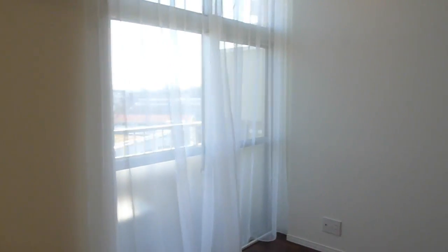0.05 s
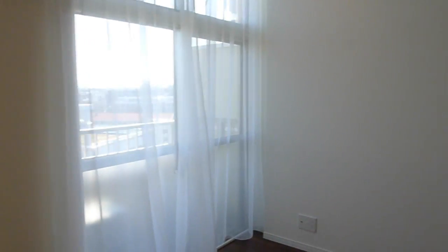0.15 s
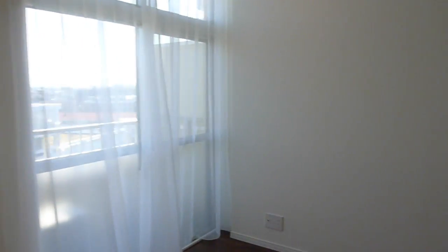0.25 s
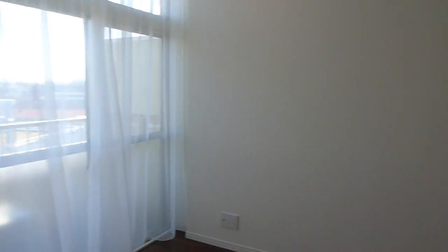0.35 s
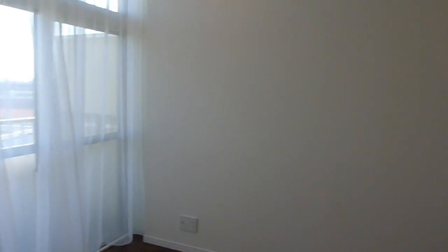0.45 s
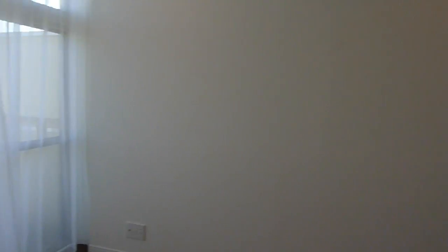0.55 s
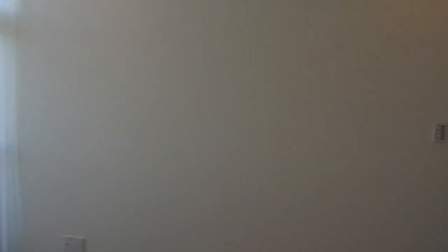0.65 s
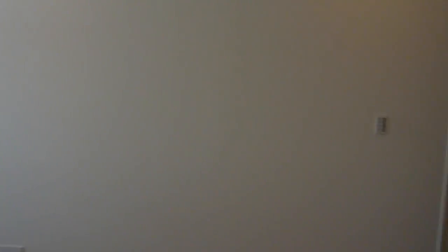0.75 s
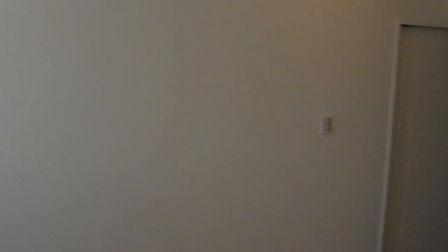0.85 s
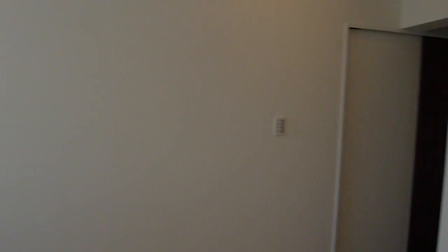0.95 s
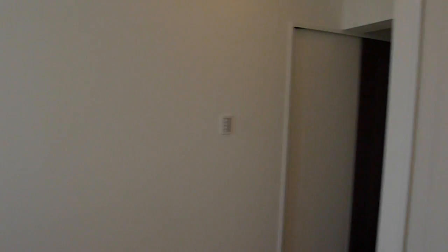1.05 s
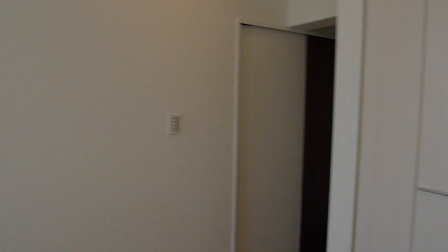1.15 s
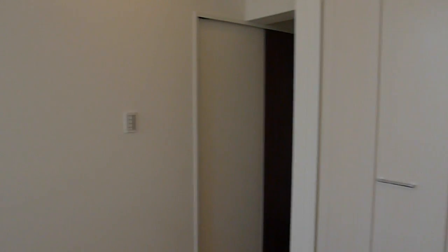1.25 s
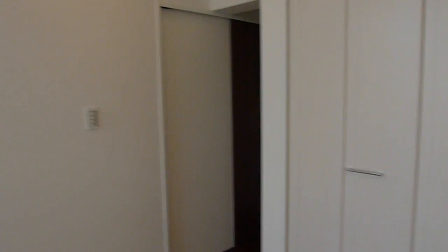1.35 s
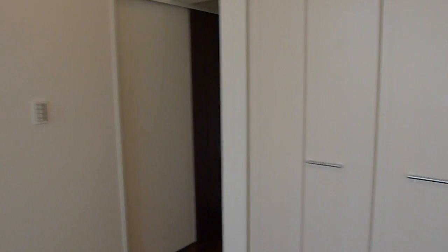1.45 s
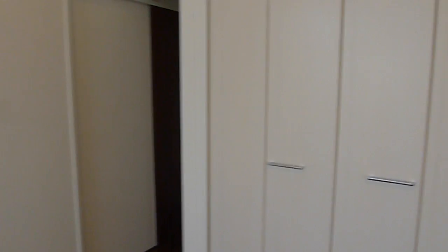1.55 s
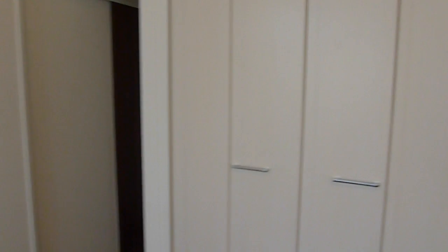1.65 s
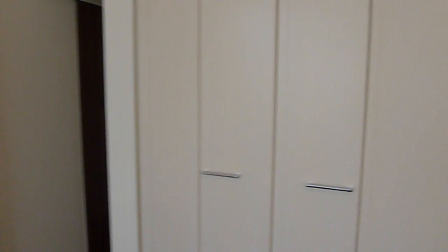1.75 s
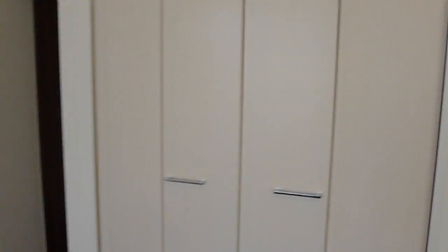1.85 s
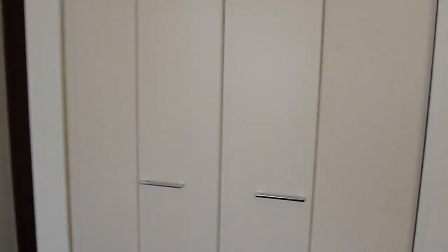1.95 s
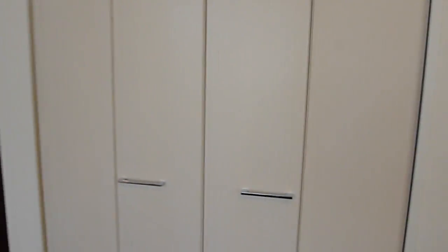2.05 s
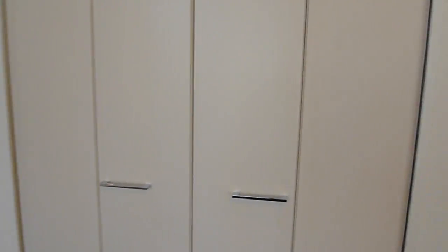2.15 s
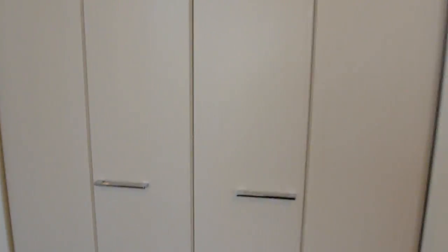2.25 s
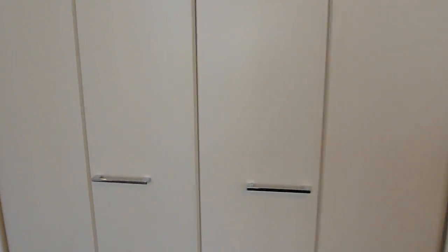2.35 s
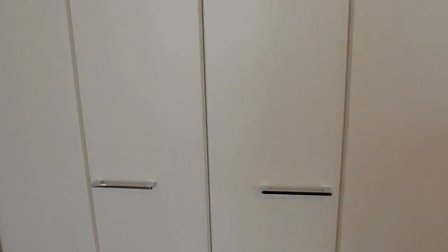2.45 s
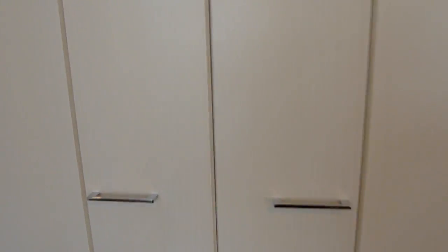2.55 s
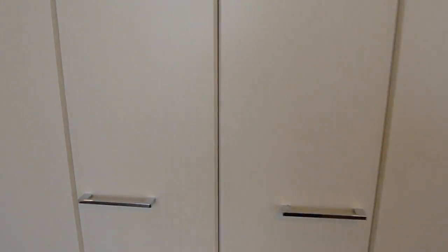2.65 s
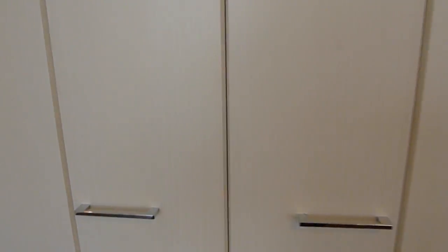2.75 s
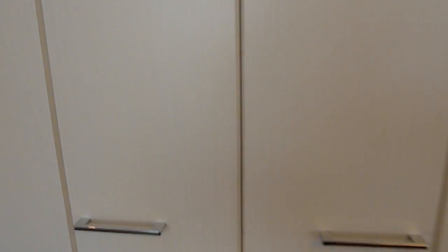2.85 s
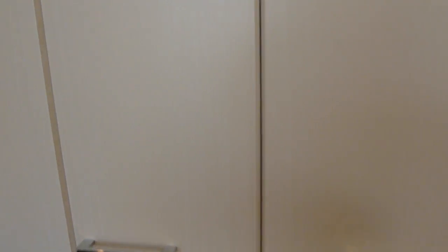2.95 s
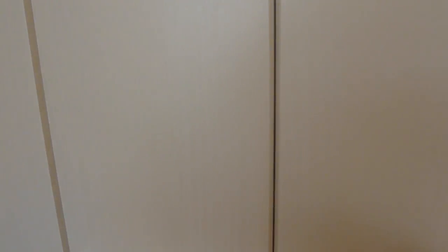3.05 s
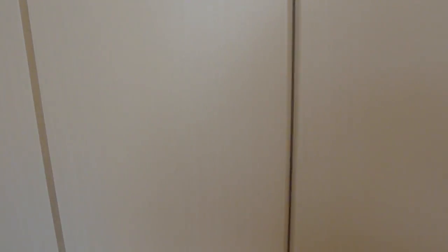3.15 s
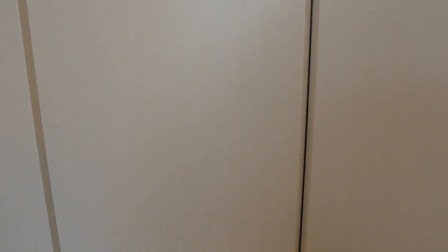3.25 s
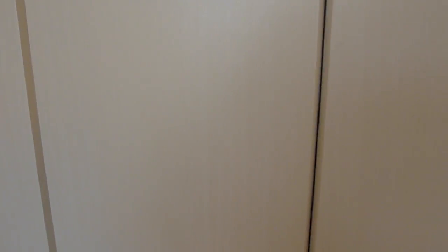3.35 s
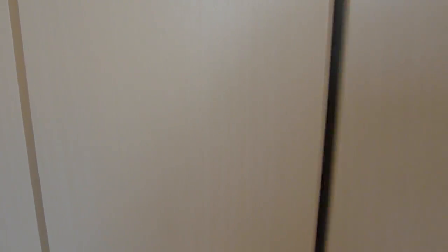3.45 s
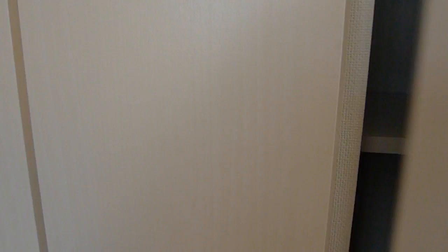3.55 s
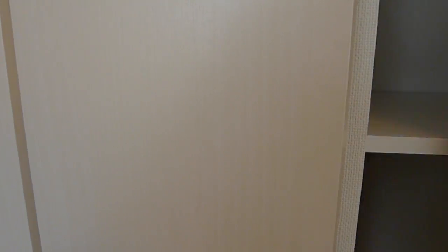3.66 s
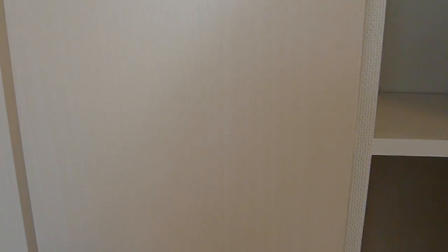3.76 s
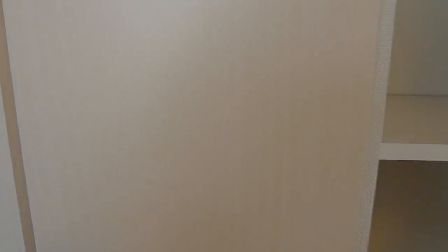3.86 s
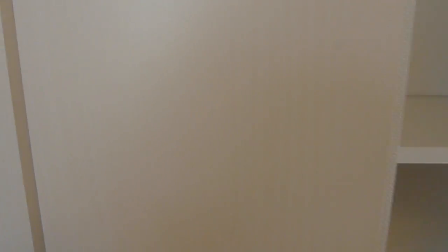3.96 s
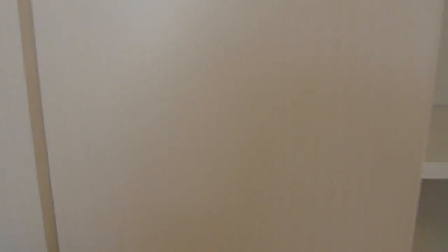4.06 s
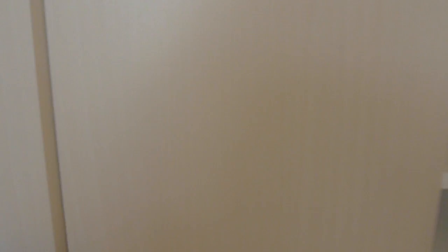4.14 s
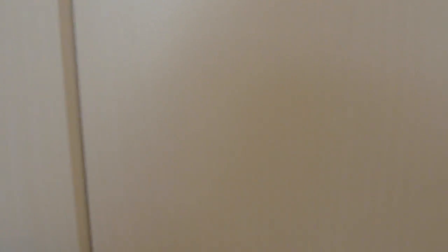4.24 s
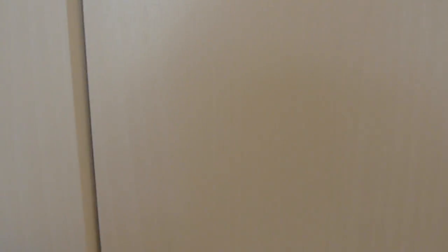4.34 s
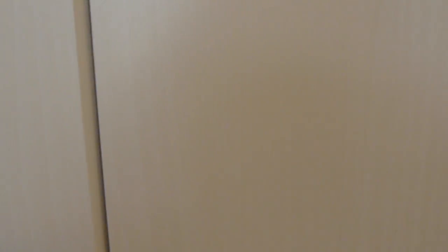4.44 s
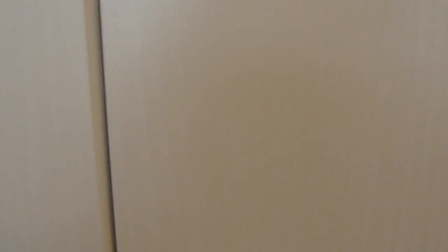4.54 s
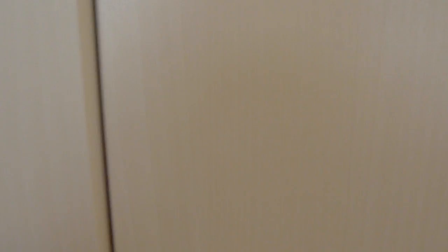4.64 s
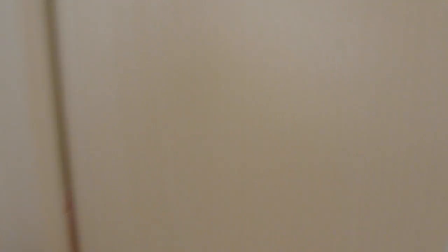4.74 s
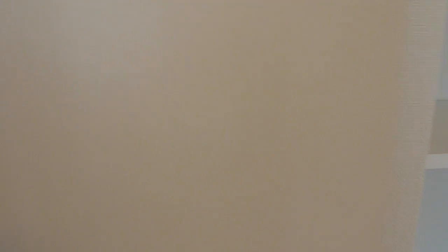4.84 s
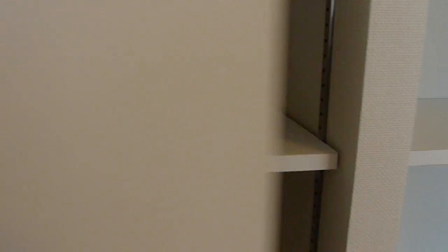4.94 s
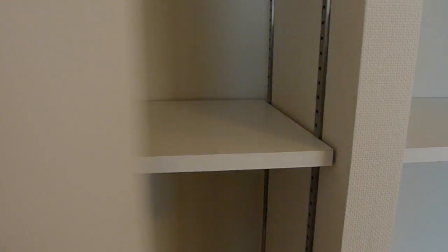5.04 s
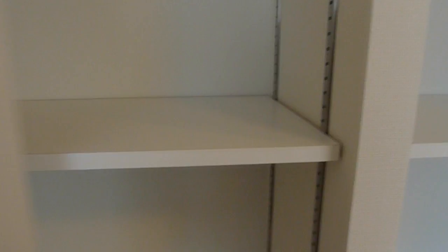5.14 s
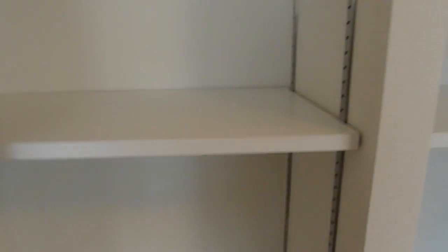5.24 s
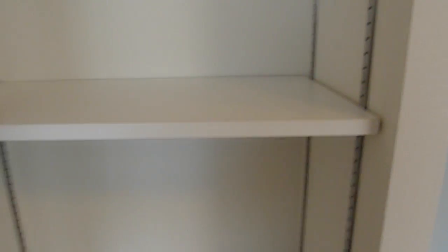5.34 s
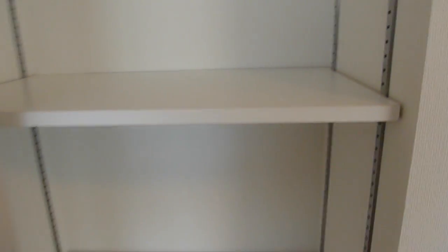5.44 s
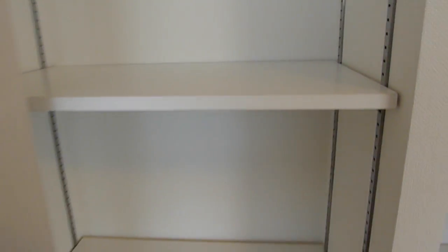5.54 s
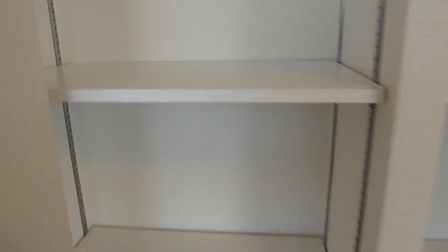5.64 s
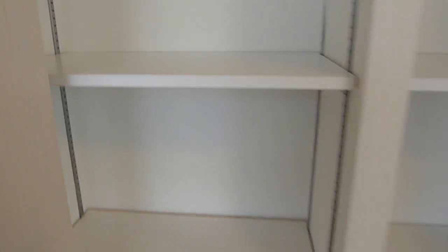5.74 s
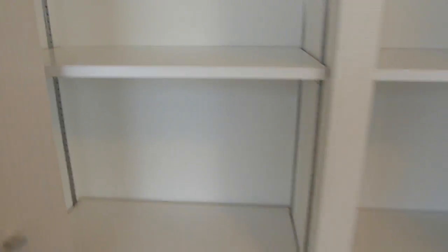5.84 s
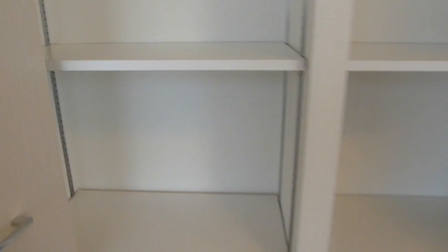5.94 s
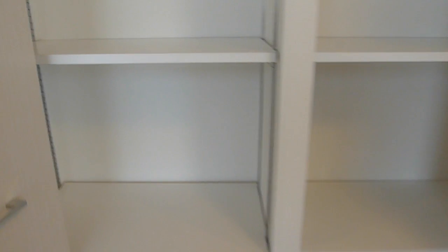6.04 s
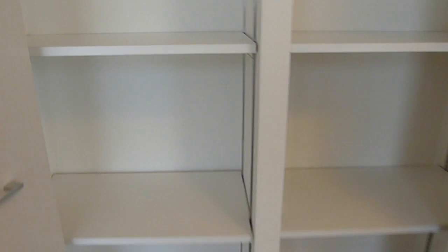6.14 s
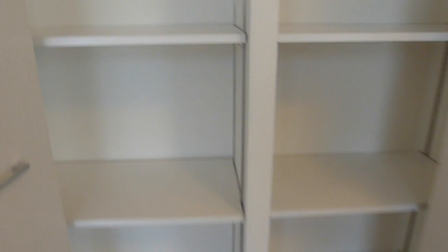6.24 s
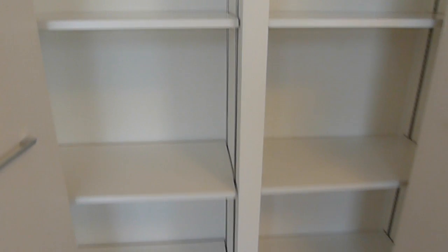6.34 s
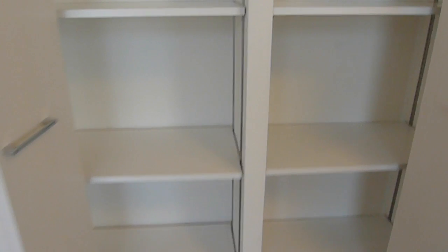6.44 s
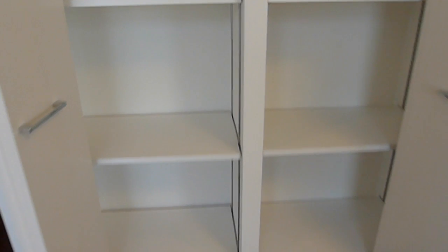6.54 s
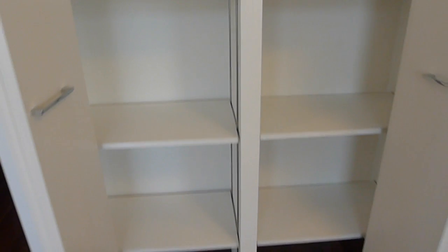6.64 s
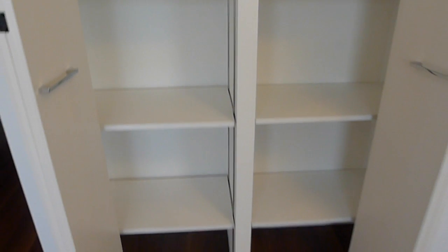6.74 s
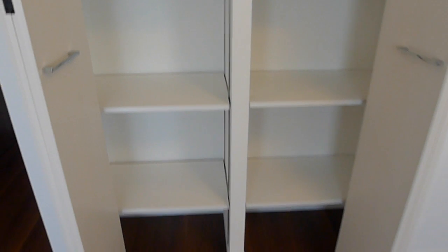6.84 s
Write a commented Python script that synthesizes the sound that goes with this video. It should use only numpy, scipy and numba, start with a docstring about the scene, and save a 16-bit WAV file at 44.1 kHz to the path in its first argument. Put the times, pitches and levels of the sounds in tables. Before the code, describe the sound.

Two hollow folding closet doors grind open along a metal track in turn, with rattles and sharp knocks, over a faint sinking engine drone.

```python
"""Two folding closet doors are pulled open in a bare room: roller grit grinds along the track and shakes
the hollow panels, metal and closet air as ringing modes; hinges and stops knock; sliding pins groan.
Someone walks with a small mono camera: clothes and socks swish as shaped noise, the floor booms and creaks,
ticks sound close to the microphone. Behind it a far engine drones as harmonics sinking in pitch, over
the noise hush of the room and a faint electronic whine."""
import sys
import numpy as np
from scipy import signal
from scipy.io import wavfile
from scipy.ndimage import uniform_filter1d
from numba import njit

SR = 44100
rng = np.random.default_rng(int(sys.argv[2]) if len(sys.argv) > 2 else 0)


def pcm_store(signal):
    """Save signal as 16-bit PCM."""
    levels = np.round(np.clip(np.atleast_2d(signal), -1, 1) * 32767)
    wavfile.write(sys.argv[1], SR, levels.astype(np.int16).T)


N = 304069
T = np.arange(N) / SR

# room and microphone noise spectrum, relative: freq_hz, density_db_per_hz
HUSH_SPECTRUM = [(15, -45), (25, 12.5), (102, -3), (161, 5.5), (335, 0.5), (1070, -4.5), (5000, -15.5),
                 (7510, -109.5), (8140, -87), (13600, -76), (14800, -33), (16000, -39)]
HUSH_RMS_DB = -48.5
WHINE_HZ, WHINE_RMS_DB = 14928, -76

# engine firing rate before random waver: time_s, firing_rate_hz
ENGINE_RATE = [(0, 39.48), (.86, 37.25), (1.3, 36.43), (2.15, 33.98), (3, 33.5), (6.9, 31.25)]
# engine gain: time_s, level_db
ENGINE_GAIN = [(0, -47), (.4, -50.5), (.9, -46), (1.4, -52.5), (2, -53), (2.6, -54.5), (3, -50.5), (6, -59),
               (6.9, -59)]
# engine harmonics: multiple_of_firing_rate, relative_level_db
ENGINE_HARMONICS = [(3, -7), (4, -1.5), (5, 1), (6, -5.5), (7, -9)]

# small dry ticks close to the microphone: start_s, level_db, pitch_hz, snap_to_tone_ratio, decay_tau_s
DRY_TICKS = [(1.479, -28.5, 1520, 1.2, 0.0018), (1.4816, -28.5, 603, 1.5, 0.0014),
             (2.1346, -20, 7100, 0.3, 0.00065), (2.1376, -18, 6070, 0.88, 0.001),
             (2.1418, -22, 6650, 0.6, 0.00088), (2.283, -30.5, 2100, 0.1, 0.002),
             (2.302, -20, 503, 1, 0.00033), (3.0878, -44.5, 8850, 0.5, .001),
             (3.283, -23, 7000, .4, 0.00057), (3.306, -24, 6200, 1, 0.00055),
             (3.398, -22, 5500, 0.84, 0.0012), (3.474, -36, 9270, .4, .0008),
             (5.108, -37.5, 10600, 0.9, 0.0023), (6.8495, -20, 2950, 0.23, 0.00035)]
TICK_THIN = 0.24  # how much the snap loses its low end

# faint creaks underfoot: start_s, length_s, slip_rate_hz, level_db
FLOOR_CREAKS = [(0.882, .05, 960, -44), (1.574, 0.032, 529, -44), (1.664, 0.059, 539, -41.5),
                (2.216, 0.052, 1003, -49)]
CREAK_OCTAVE_DB, CREAK_WAVER = -5, 0.1

# floorboards booming under the weight: time_s, level_db
FLOOR_BOOM = [(0, -62), (2.0, -63), (2.2, -65), (2.55, -50), (2.75, -54), (3.1, -64), (6.9, -77)]
# body movements: full_strength_s, rise_s, hold_s, cloth_db, feet_db
MOVEMENTS = [(0.006, 0.06, 0.055, -55, -44), (0.259, 0.045, 0.13, -39.5, -51),
             (0.63, 0.19, 0.049, -51.5, -44), (0.965, 0.24, 0.036, -49, -48),
             (1.243, 0.21, 0.0061, -45.5, -53), (1.503, 0.1, 0.14, -54.5, -48),
             (1.646, 0.27, 0.027, -48, -63), (1.933, 0.32, 0.033, -54, -45.5), (2.214, 0.12, 0.1, -42, -55),
             (2.518, 0.086, .02, -42, -49), (2.759, 0.051, 0.16, -32, -64), (3.157, 0.11, 0.23, -44, -44.5),
             (3.64, 0.69, 0.2, -44, -57), (4.047, 0.0041, 0.0034, -36, -51),
             (4.295, 0.065, 0.065, -47.5, -55), (4.46, 0.22, 0.014, -43, -45.5),
             (4.884, 1, 0.58, -50.5, -41.5), (5.52, .07, .01, -60, -63), (5.778, 0.1, 0.051, -48, -56),
             (6.17, 0.31, 0.014, -50, -70), (6.362, 0.037, 0.05, -41, -73),
             (6.731, 0.25, 0.011, -49.5, -45.5)]
RISE_DB, CLOTH_FADE_DB_PER_S, FEET_FADE_DB_PER_S = 19.5, 113, 39

# modes of the first door's panel: freq_hz, relative_level_db, t60_s
FIRST_PANEL_MODES = [(236, -6, 0.033), (313.5, -3.5, 0.051), (425, -1.5, 0.035), (521, -8, 0.045),
                     (602, -3.5, 0.036), (688, -7.5, 0.04), (823, -2.5, 0.021), (995, -5, 0.011)]
# modes of the second door's panel: freq_hz, relative_level_db, t60_s
SECOND_PANEL_MODES = [(203, -7.5, 0.099), (304, -4.5, 0.02), (390.5, -1.5, 0.034), (475, -6, 0.036),
                      (577, -1, 0.018), (728, -3, 0.015), (908, -3, 0.026), (1095, -5, 0.015)]
# modes of the metal track: freq_hz, relative_level_db, t60_s
TRACK_MODES = [(1130, 8.5, 0.007), (1430, -1, 0.034), (1562, 0.5, 0.033), (1763, 1, 0.023),
               (2032, 3, 0.017), (2343, 5.5, 0.0093)]
# modes of the roller pin: freq_hz, relative_level_db, t60_s
PIN_MODES = [(2765, 6, 0.0053), (3076, 1, 0.0091), (3530, 1.5, 0.0048), (4250, 2, 0.0057)]
# modes of the air shut in the closet: freq_hz, relative_level_db, t60_s
AIR_MODES = [(85.7, -7, 0.079), (131, -3.5, 0.046), (180, -2, 0.04)]
PANEL_SHIFT_DB, METAL_SHIFT_DB, AIR_SHIFT_DB = 3.2, 1.3, 1.9  # wander of each mode's drive

# one table per door, its roller travel: time_s, roller_force_db, air_thump_db
DOOR_TRAVEL = [
    [(3.14, -51, -48), (3.234, -39, -47), (3.3, -32, -44), (3.46, -33.5, -49), (3.55, -25, -39),
     (3.63, -21, -29), (3.718, -20, -36), (3.856, -22, -26.5), (3.95, -27.5, -35.5), (4.04, -34, -44),
     (4.174, -42.5, -48), (4.378, -48.5, -49), (4.43, -37.5, -50)],
    [(4.62, -49, -45), (4.716, -34.5, -51), (4.86, -21.5, -34), (4.95, -17, -33.5), (5.068, -19, -34),
     (5.19, -23.5, -20.5), (5.3, -31, -63), (5.44, -31, -31), (5.57, -31.5, -53), (5.73, -43.5, -64),
     (5.8, -36, -39), (6.0, -51, -61)],
]
SECOND_DOOR_S = 4.435
FULL_FORCE_DB = -20
TRACK_DB, TRACK_SLOPE = -23.5, 1.44  # level at full force; dB lost per dB of force
RUB_DB, RUB_SLOPE = -24.5, 1.66
SCRAPE_DB, GRIND_DB = 3.5, -1.5  # over the rub; over the track rattle
SCRAPE_DAMPING = 1.1
SOFT_HZ, HARD_HZ, HARDEN_DB_PER_OCTAVE = 412, 830, 11  # knocks push softly; rolling hardens with force

# hinge and stop knocks, levels before mixing: start_s, panel_db, crack_db, air_thump_db, chatter_tau_s
DOOR_KNOCKS = [(3.119, -29.5, -33, -34, 0.0073), (3.14, -22.5, -33, -45, 0.015),
               (3.199, -35, -53, -32.5, 0.0055), (3.294, -20.5, -16.5, -45, 0.0042),
               (3.314, -18, -24, -33, 0.017), (3.398, -22.5, -17, -20, 0.033),
               (4.048, -18, -16, -54, 0.016), (4.095, -27, -17.5, -48, 0.031),
               (4.441, -16, -24, -31, 0.039), (4.474, -19, -25, -48, 0.017), (4.507, -23, -40, -51, 0.0055),
               (4.554, -23, -21.5, -24, 0.0074), (4.574, -18.5, -10.5, -18, 0.039),
               (4.583, -17.5, -30, -13, 0.0029), (5.158, -12, -16, -20, 0.0078),
               (5.322, -2, -10, -11, 0.017), (5.352, -16, -30, -35, 0.0033),
               (5.363, -27, -6.5, -41, 0.0085), (5.375, -6.5, -27, -21, 0.0036),
               (5.471, -13.5, -19, -16, 0.014), (5.483, -6.5, -16.5, -20.5, 0.038),
               (5.519, -11.5, -16.5, -47, 0.026), (5.557, -11.5, -32, -20, 0.005),
               (5.762, -30, -27.5, -47, 0.0064)]
# stick-slip of the sliding pin near a mode of door or track: start_s, length_s, pitch_hz, level_db
PIN_GROANS = [(3.118, 0.032, 1500, -42), (3.245, 0.024, 870, -33.5), (3.556, 0.041, 2580, -32),
              (3.584, .13, 447, -22), (3.745, 0.14, 441, -23), (4.8, 0.14, 595, -30),
              (4.85, 0.063, 1564, -22.5), (4.92, 0.064, 910, -32), (4.944, 0.15, 379, -23.5),
              (5.233, 0.084, 1480, -32.5)]
GROAN_DAMPING = 0.054

ROOM_T60_S, ROOM_DB = 0.62, -13
NOTCH_HZ, TOP_HZ = 7464, 15750


def undb(db):
    """Amplitude from dB."""
    return 10 ** (np.asarray(db) / 20)


def unit(x):
    """Scale to an RMS of 1."""
    return x / np.sqrt(np.mean(x ** 2))


def curves(*tables):
    """Columns of the tables, joined in time; the first column falls silent between tables."""
    rows = []
    for table in tables:
        before = (table[0][0] - 1 / 200, -120, *table[0][2:])
        after = (table[-1][0] + 1 / 200, -120, *table[-1][2:])
        rows += [before, *table, after]
    time_s, *columns = np.transpose(rows)
    return [np.interp(T, time_s, column) for column in columns]


@njit
def svf(x, hz, damping):
    """State-variable band-pass with a moving centre, gain 1 there."""
    y, b, l = np.empty(len(x)), 0., 0.
    for i in range(len(x)):
        g = np.tan(np.pi * hz[i] / SR)
        v = (b + g * (x[i] - l)) / (1 + g * (g + damping))
        b, l, y[i] = 2 * v - b, l + 2 * g * v, damping * v
    return y


def band(x, hz, damping):
    """Band-pass around a fixed or moving centre; more damping is wider."""
    return svf(x, np.clip(hz + 0 * T, 20, SR / 2.3), float(damping))


def noise_band(hz, damping, second_hz, second_damping):
    """White noise through two band-passes."""
    return band(band(rng.standard_normal(N), hz, damping), second_hz, second_damping)


def walk(rate_hz):
    """Random levels held 1 / rate_hz seconds and slewed twice; spread near 1."""
    k = int(SR / rate_hz)
    held = np.repeat(rng.standard_normal(N // k + 1), k)
    return 1.26 * uniform_filter1d(uniform_filter1d(held, k), k)[:N]


def swell(start_s, length_s):
    """Gain that rises and falls once, as the root of a half sine."""
    return np.sqrt(np.sin(np.pi * np.clip((T - start_s) / length_s, 0, 1)).clip(0))


def decaying_sine(t, hz, t60_s):
    """Free ringing of one mode, 60 dB down after t60_s."""
    return np.sin(2 * np.pi * hz * t) * 1000 ** (-t / t60_s)


def ring(force, modes):
    """Sum of decaying modes; an impulse of size 1 gives a peak near 1."""
    t = np.arange(SR // 2) / SR
    response = sum(undb(db) * decaying_sine(t, hz, t60_s) for hz, db, t60_s in modes)
    return signal.fftconvolve(force, response / np.abs(response).max())[:N]


def shake(force, modes, shift_db):
    """Each mode is driven more or less as the roller moves along; unit force gives near unit sound."""
    t = np.arange(SR // 4) / SR
    rings = [(-1) ** k * undb(db) * decaying_sine(t, hz, t60_s)
             for k, (hz, db, t60_s) in enumerate(modes)]
    out = sum(signal.fftconvolve(force * undb(shift_db * walk(22)), r)[:N] for r in rings)
    # below its lowest mode a body hardly moves any air
    high_pass = signal.butter(2, 0.75 * modes[0][0], "high", fs=SR, output="sos")
    return signal.sosfilt(high_pass, out) / np.linalg.norm(rings)


def panels(force, play):
    """Force before the hand changes doors sounds the first door, later force the second."""
    first = T < SECOND_DOOR_S
    return play(force * first, FIRST_PANEL_MODES) + play(force * ~first, SECOND_PANEL_MODES)


def hush():
    """Third-octave bands of room and microphone noise that flicker a little."""
    hz_points, db_points = np.transpose(HUSH_SPECTRUM)
    out = 0
    for hz in 30 * 2 ** np.arange(0, 9.2, 1 / 3):
        noise = noise_band(hz, 0.34, hz, 0.38)
        density_db = np.interp(np.log(hz), np.log(hz_points), db_points)
        out = out + undb(density_db + 3.6 * walk(8.8)) * noise
    return unit(out) * undb(HUSH_RMS_DB)


def whine():
    """Steady sine from the camera's electronics."""
    return undb(WHINE_RMS_DB) * np.sqrt(2) * np.sin(2 * np.pi * WHINE_HZ * T)


def engine():
    """Firing-rate harmonics, each fading in and out through the air, in a blur of exhaust noise."""
    rate_hz = np.interp(T, *np.transpose(ENGINE_RATE)) * (1 + 0.0097 * walk(5.6))
    phase = 2 * np.pi * np.cumsum(rate_hz) / SR
    tone = sum(undb(db + 3.2 * walk(4.96)) * np.sin(k * phase + k * k) for k, db in ENGINE_HARMONICS)
    blur = unit(noise_band(197, 0.9, 197, 0.9))
    return (tone + 0.48 * blur) * undb(np.interp(T, *np.transpose(ENGINE_GAIN)))


def ticks():
    """Each tick is a fast-decaying sine at its own pitch plus a snap of thinned noise."""
    out = np.zeros(N)
    t = np.arange(SR // 50) / SR
    for start_s, db, hz, snap_ratio, tau_s in DRY_TICKS:
        noise = rng.standard_normal(len(t))
        snap = noise - TICK_THIN * np.roll(noise, 1)
        tick = np.sin(2 * np.pi * hz * t) + snap_ratio * snap
        i = int(start_s * SR)
        out[i:i + len(t)] += undb(db) * tick * np.exp(-t / max(tau_s, 1 / 5000))
    return out


def creaks():
    """Short stick-slip squeaks with an octave above, unsteady in rate and strength."""
    wavering_s = np.cumsum(1 + CREAK_WAVER * walk(200)) / SR
    out = 0
    for start_s, length_s, hz, db in FLOOR_CREAKS:
        phase = 2 * np.pi * hz * wavering_s
        tone = np.sin(phase) + undb(CREAK_OCTAVE_DB) * np.sin(2 * phase)
        out = out + undb(db) * swell(start_s, length_s) * tone
    return out * undb(3.5 * walk(90.1))


def movements(db, fade_db_per_s):
    """Gain over time: every movement swells by RISE_DB, holds and fades; they add in power."""
    full_s, rise_s, hold_s = np.array(MOVEMENTS).T[:3, :, None]
    before_db = RISE_DB * np.clip(full_s - T, 0, None) / np.maximum(rise_s, 1 / 200)
    after_db = fade_db_per_s * np.clip(T - full_s - hold_s, 0, None)
    return np.sqrt(np.sum(undb(2 * (db[:, None] - before_db - after_db)), axis=0))


def walker():
    """Fine fibre friction for the cloth, coarser and duller for feet; the weight makes the floor boom."""
    cloth_db, feet_db = np.transpose(MOVEMENTS)[-2:]
    fibres = rng.standard_normal(N) * undb(walk(80))
    cloth = unit(band(band(fibres, 4040, 2.6), 7100, 3.6))
    soles = rng.standard_normal(N) * undb(walk(40))
    feet = unit(band(band(soles, 900 * 2 ** (0.69 * walk(6.17)), 1.17), 550, 10.7))
    boom = unit(noise_band(79, 0.19, 87, 0.31)) * undb(curves(FLOOR_BOOM)[0])
    cloth = cloth * movements(cloth_db, CLOTH_FADE_DB_PER_S)
    feet = feet * movements(feet_db, FEET_FADE_DB_PER_S)
    return cloth + feet + boom


def groans():
    """Stick-slip as narrow noise that wanders around the pitch of a mode, swelling and fading."""
    out = np.zeros(N)
    for start_s, length_s, hz, db in PIN_GROANS:
        slips = unit(band(rng.standard_normal(N), hz, GROAN_DAMPING))
        out += undb(db) * swell(start_s, length_s) * slips
    return out


def blows(times_s, levels_db, chatter_tau_s, sharp):
    """A contact of some sharpness at each time, with a dying chatter."""
    out = np.zeros(N)
    t = np.arange(SR // 5) / SR
    for start_s, db, tau_s in zip(times_s, levels_db, chatter_tau_s):
        tau_s = max(tau_s, 1 / 1000)
        force = rng.standard_normal(len(t)) * np.exp(-t / tau_s) / np.sqrt(tau_s * SR / 2)
        force[0] += sharp
        i = int(start_s * SR)
        out[i:i + len(t)] += undb(db) * force
    return out


def knocks():
    """Hinge and stop blows push the panel softly, crack on the metal and thump the closet air."""
    start_s, panel_db, crack_db, air_db, tau_s = np.transpose(DOOR_KNOCKS)
    crack = blows(start_s, crack_db, tau_s, 0.27)
    push = blows(start_s, panel_db, tau_s, 0.91)
    push = band(band(push, SOFT_HZ, 1.23), SOFT_HZ, 1.23)
    wood = 2.65 * panels(push, ring)
    metal = 2.35 * ring(crack, TRACK_MODES + PIN_MODES)
    direct = 7.2 * band(crack, 2300, 0.82)
    air = ring(blows(start_s, air_db, tau_s, 1.0), AIR_MODES)
    return 0.95 * (wood + metal + direct) + 0.78 * air


def grit(per_s, scatter_db):
    """Random bumps of very uneven size."""
    size = undb(scatter_db * rng.exponential(size=N))
    return (rng.random(N) < per_s / SR) * rng.choice([-1, 1], N) * size


def rolling():
    """Roller grit shakes the panel, the metal track and pin, and the air shut in the closet."""
    force_db, thump_db = curves(*DOOR_TRAVEL)
    over_full_db = force_db - FULL_FORCE_DB
    # harder rolling sounds brighter
    track_db = TRACK_DB + TRACK_SLOPE * over_full_db
    rub_db = RUB_DB + RUB_SLOPE * over_full_db
    contact_hz = HARD_HZ * 2 ** (over_full_db / HARDEN_DB_PER_OCTAVE)
    bumps = unit(grit(8000, 2.0) * undb(0.7 * walk(45))) * (force_db > -100)
    push = band(bumps * undb(force_db), contact_hz, 3.1)
    rumble = panels(push, lambda x, modes: shake(x, modes, PANEL_SHIFT_DB))
    rattle = shake(bumps * undb(track_db), TRACK_MODES, METAL_SHIFT_DB)
    rub = shake(bumps * undb(rub_db), PIN_MODES, METAL_SHIFT_DB)
    # heard straight from the contact
    scrape = band(band(bumps * undb(rub_db + SCRAPE_DB), 3480, SCRAPE_DAMPING), 4080, 0.47)
    grind = band(band(bumps * undb(track_db + GRIND_DB), 1850, 0.4), 1910, 0.51)
    boom = shake(bumps * undb(thump_db), AIR_MODES, AIR_SHIFT_DB)
    return rumble + rattle + rub + scrape + grind + boom


def doors():
    """Rolling, knocks and pin groans of both doors."""
    return rolling() + knocks() + groans()


def room(x):
    """Bare walls answer with a diffuse tail whose treble dies sooner."""
    t = np.arange(SR) / SR
    noise = rng.standard_normal(SR) * (t > 0.006)
    low = signal.lfilter([0.15], [1, -0.85], noise)
    low_tail = low * 1000 ** (-t / ROOM_T60_S)
    treble_tail = 0.21 * (noise - low) * 1000 ** (-t / (0.3 * ROOM_T60_S))
    tail = low_tail + treble_tail
    return x + undb(ROOM_DB) * signal.fftconvolve(x, tail / np.linalg.norm(tail))[:N]


def scene():
    """Only the doors excite the room tail; both channels are the same."""
    background = hush() + whine() + engine()
    person = ticks() + creaks() + walker()
    mono = background + person + room(doors())
    return np.array([mono, mono])


def record(dry):
    """The camera cuts the deep bass, notches out a narrow slice of treble and ends steeply at the top."""
    x = signal.sosfilt(signal.butter(2, 55, "high", fs=SR, output="sos"), dry)
    x = signal.lfilter(*signal.iirnotch(NOTCH_HZ, 40, fs=SR), x)
    return signal.sosfilt(signal.ellip(10, 0.2, 70, TOP_HZ, fs=SR, output="sos"), x)


dry = scene()
out = record(dry)
pcm_store(out)
```